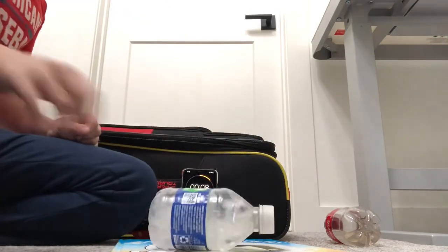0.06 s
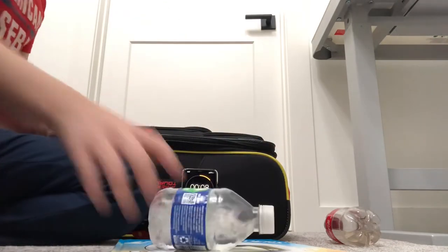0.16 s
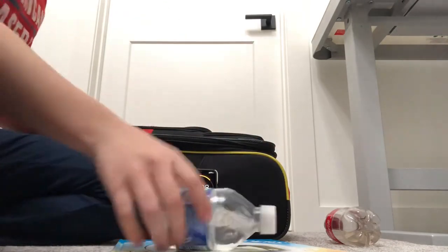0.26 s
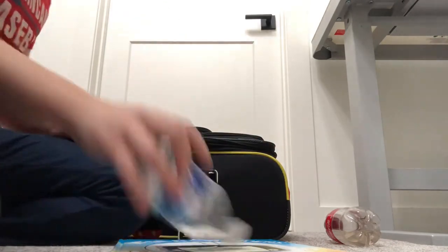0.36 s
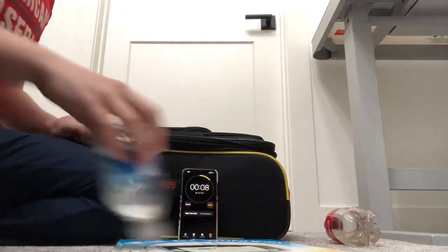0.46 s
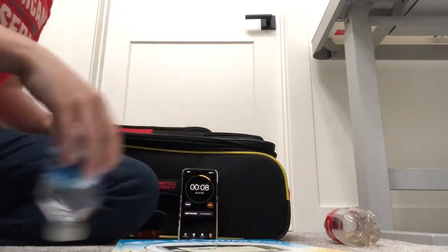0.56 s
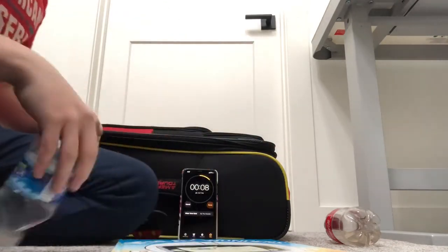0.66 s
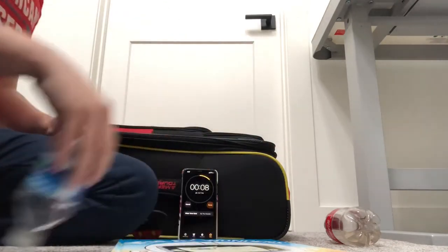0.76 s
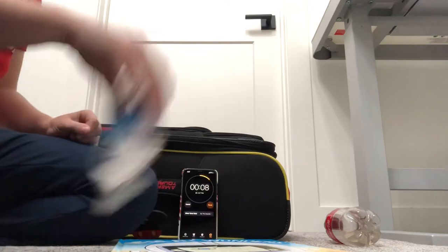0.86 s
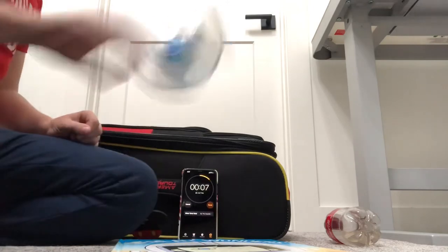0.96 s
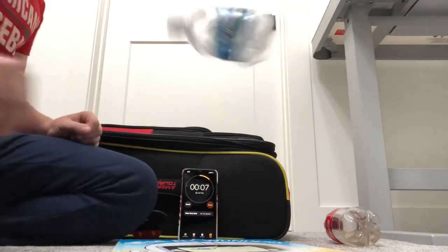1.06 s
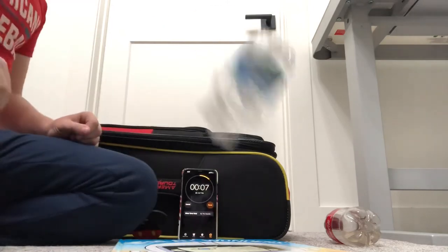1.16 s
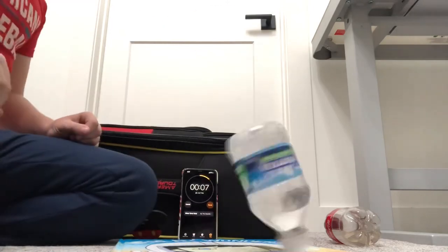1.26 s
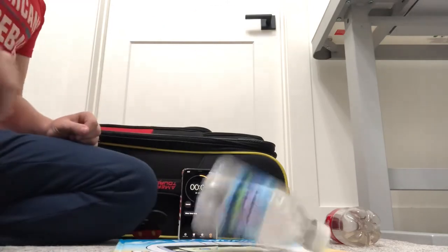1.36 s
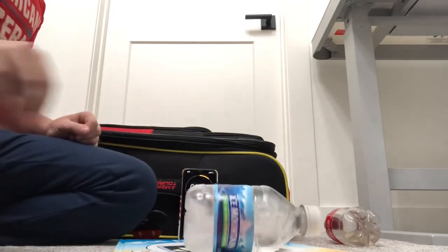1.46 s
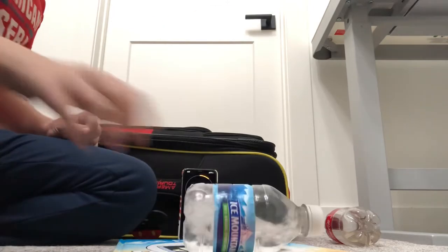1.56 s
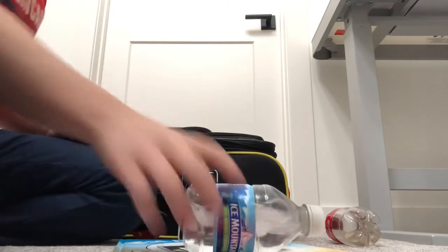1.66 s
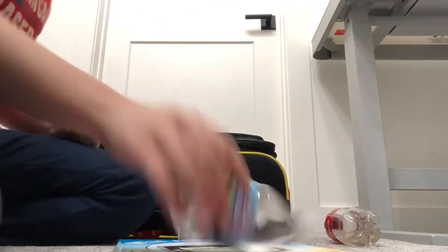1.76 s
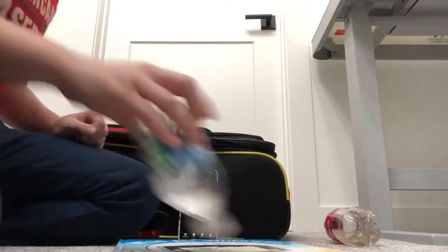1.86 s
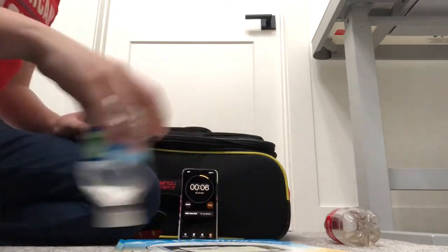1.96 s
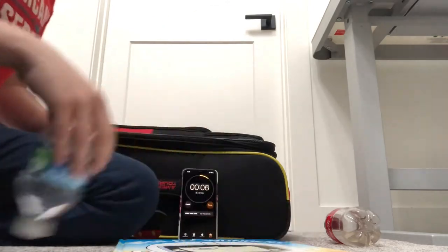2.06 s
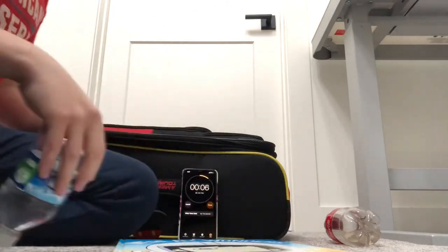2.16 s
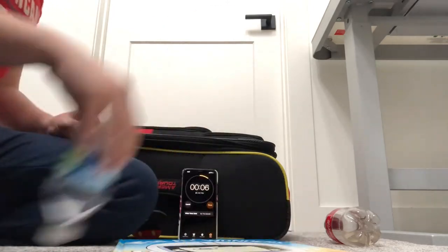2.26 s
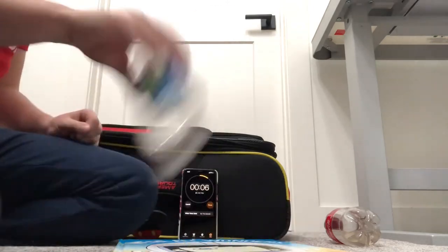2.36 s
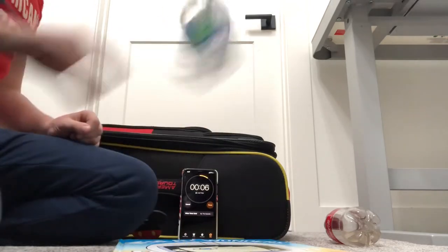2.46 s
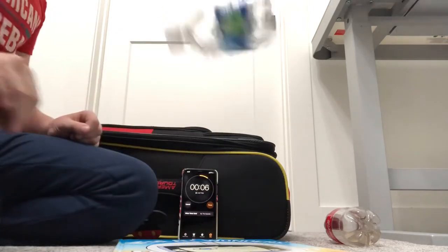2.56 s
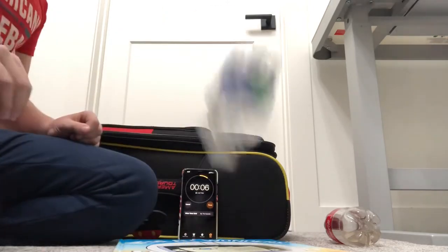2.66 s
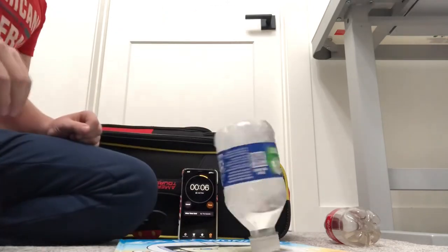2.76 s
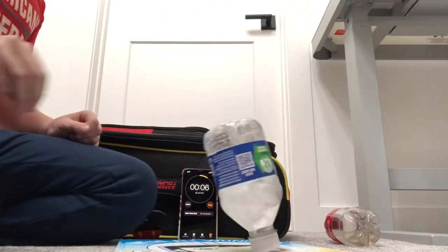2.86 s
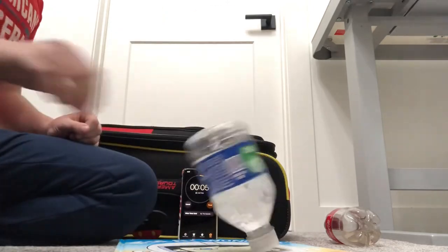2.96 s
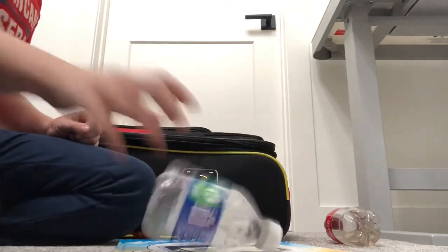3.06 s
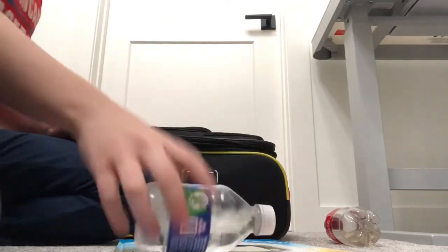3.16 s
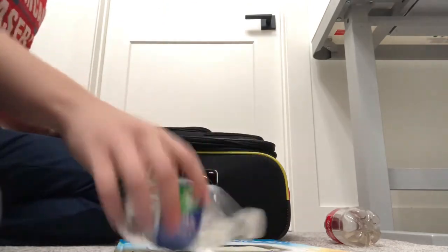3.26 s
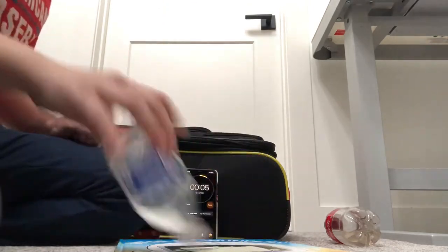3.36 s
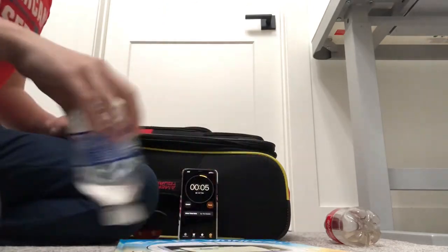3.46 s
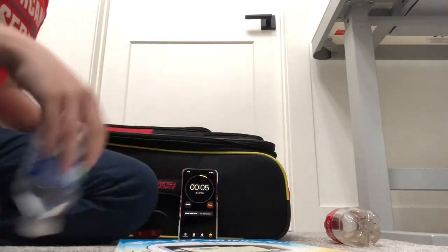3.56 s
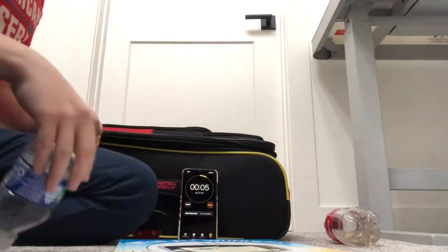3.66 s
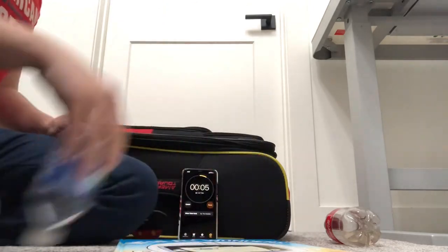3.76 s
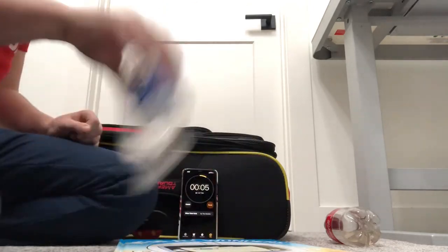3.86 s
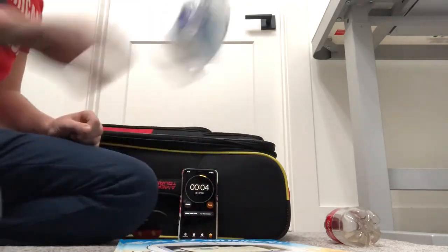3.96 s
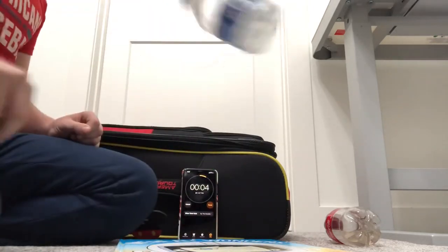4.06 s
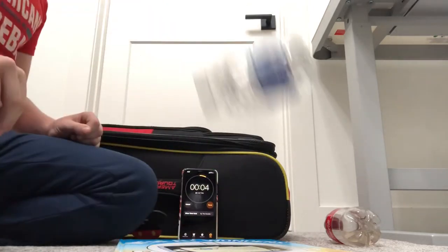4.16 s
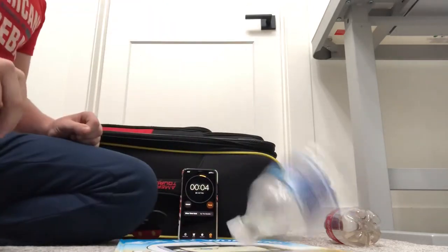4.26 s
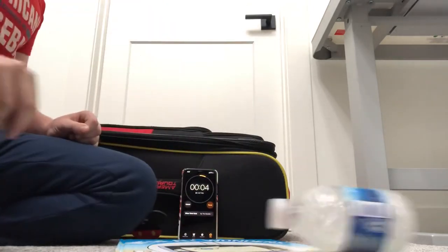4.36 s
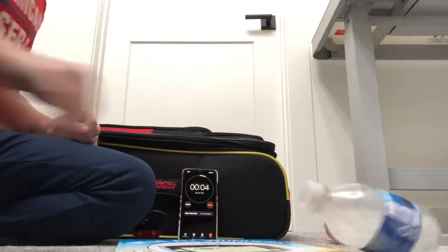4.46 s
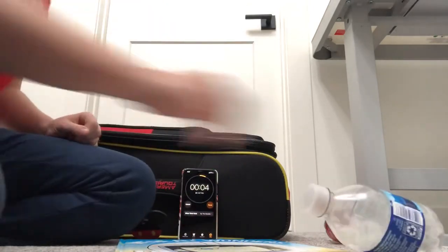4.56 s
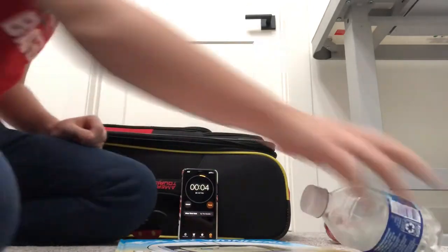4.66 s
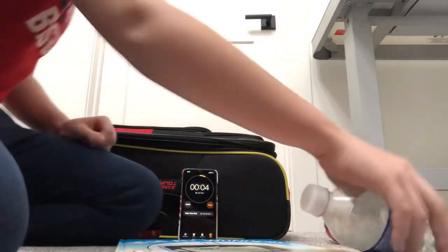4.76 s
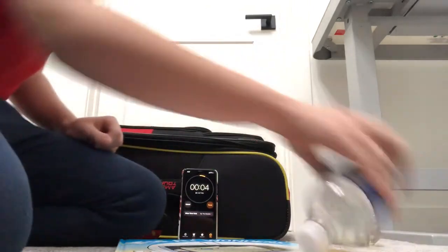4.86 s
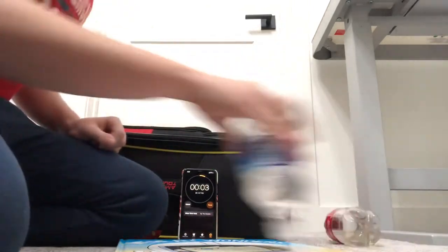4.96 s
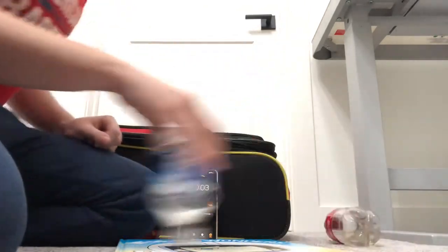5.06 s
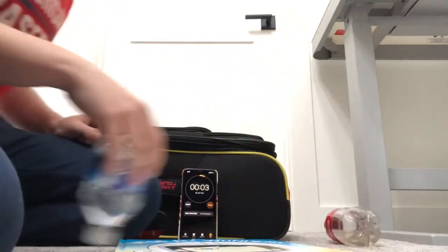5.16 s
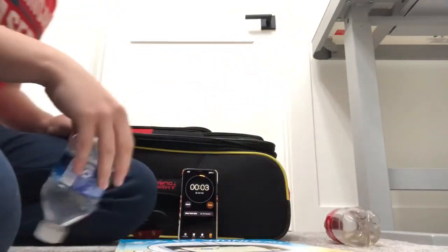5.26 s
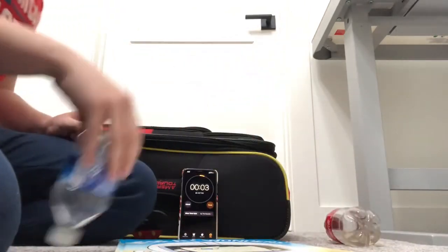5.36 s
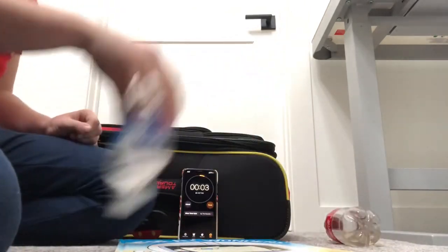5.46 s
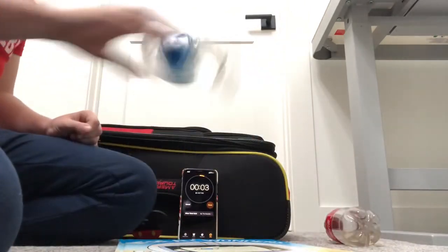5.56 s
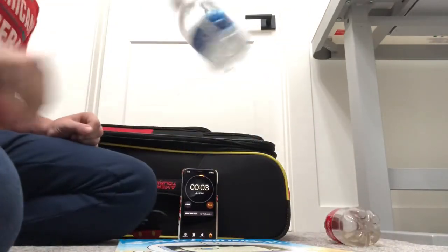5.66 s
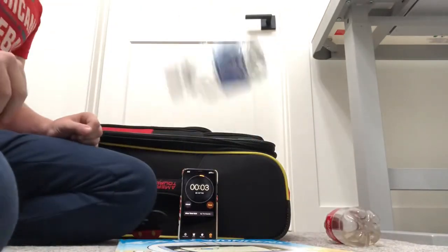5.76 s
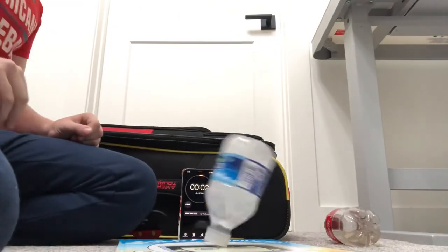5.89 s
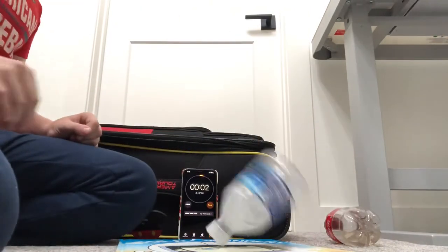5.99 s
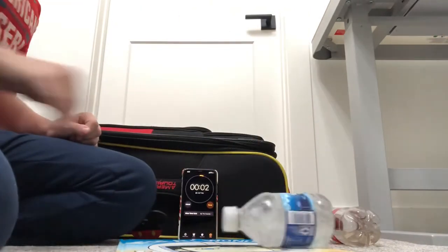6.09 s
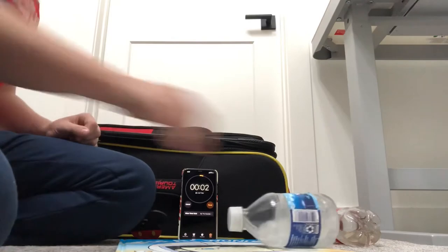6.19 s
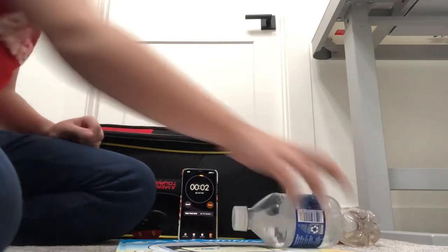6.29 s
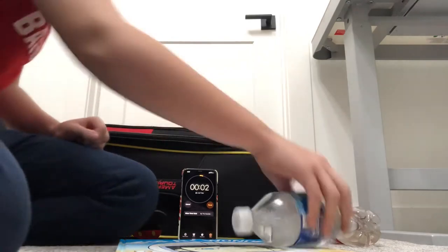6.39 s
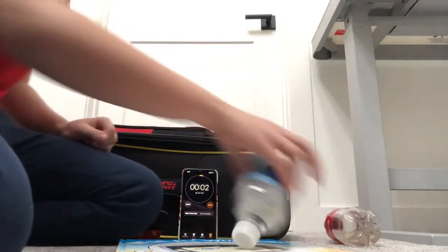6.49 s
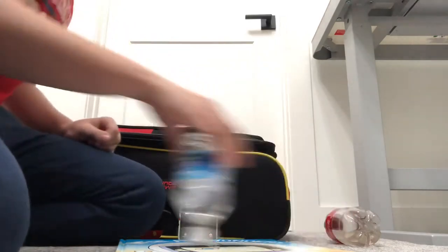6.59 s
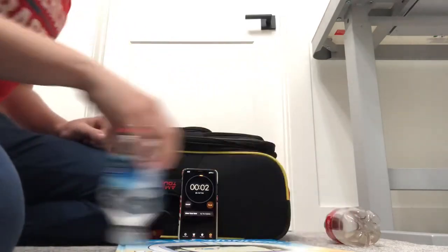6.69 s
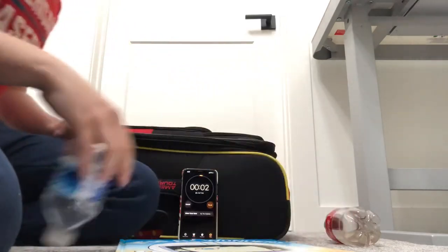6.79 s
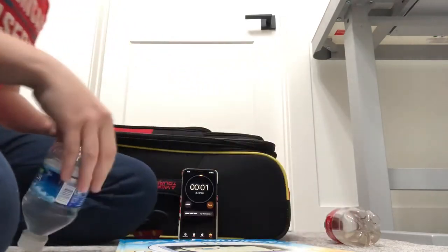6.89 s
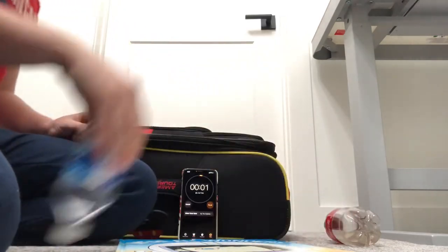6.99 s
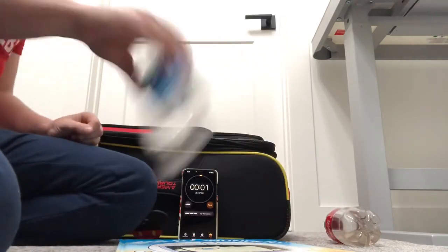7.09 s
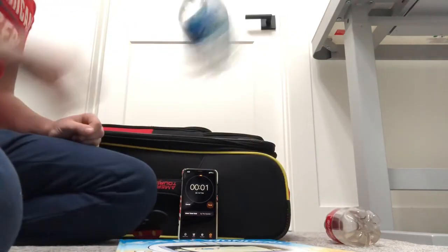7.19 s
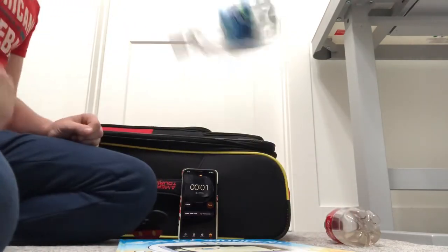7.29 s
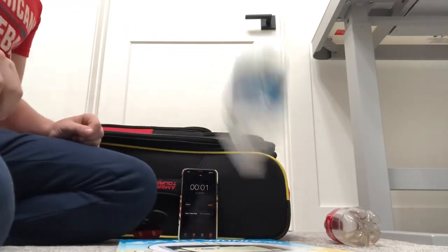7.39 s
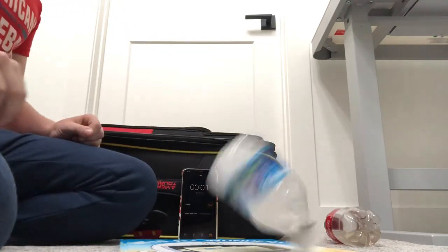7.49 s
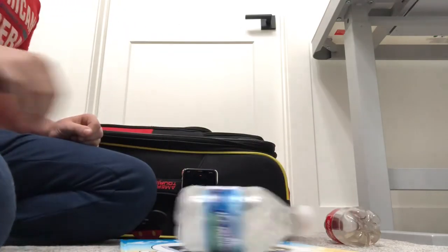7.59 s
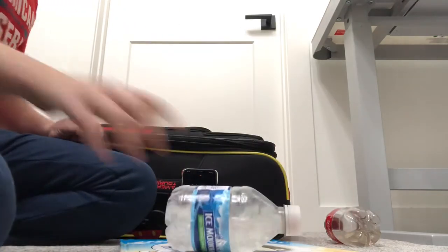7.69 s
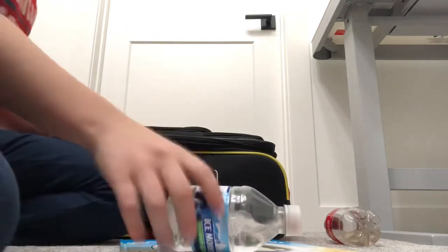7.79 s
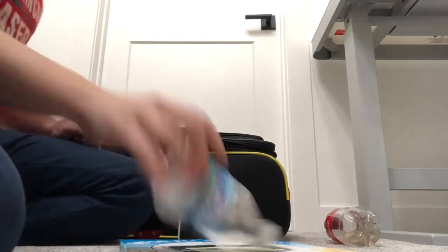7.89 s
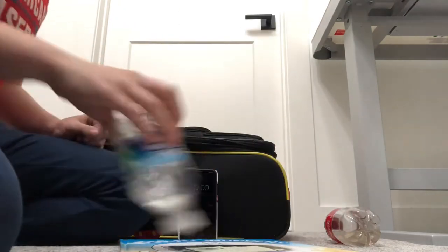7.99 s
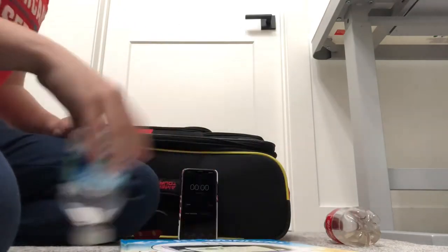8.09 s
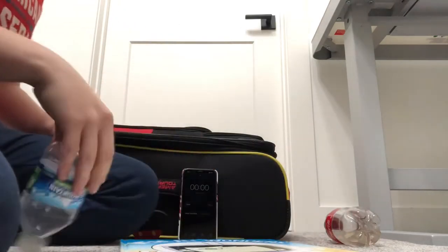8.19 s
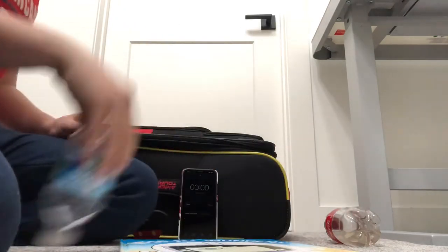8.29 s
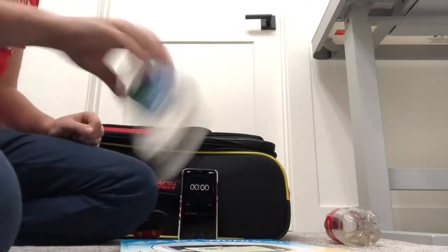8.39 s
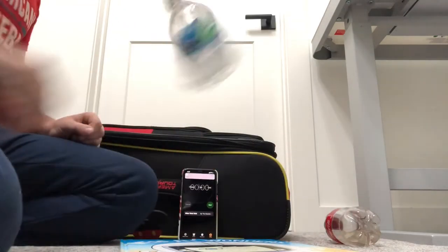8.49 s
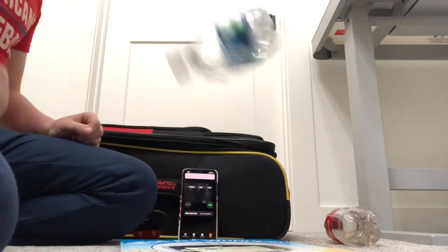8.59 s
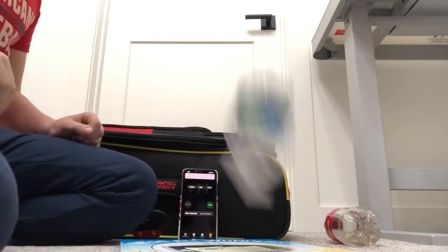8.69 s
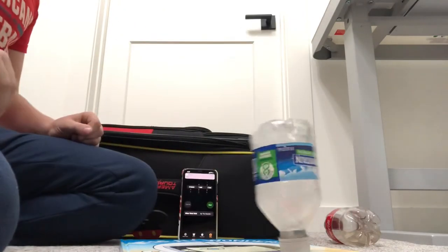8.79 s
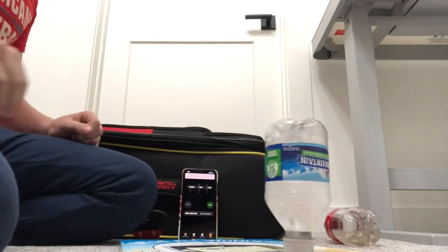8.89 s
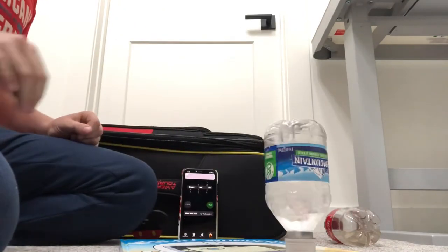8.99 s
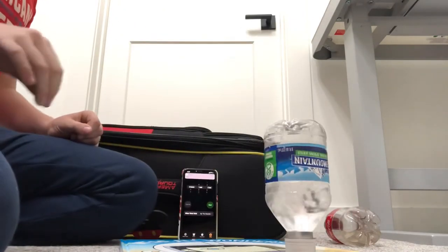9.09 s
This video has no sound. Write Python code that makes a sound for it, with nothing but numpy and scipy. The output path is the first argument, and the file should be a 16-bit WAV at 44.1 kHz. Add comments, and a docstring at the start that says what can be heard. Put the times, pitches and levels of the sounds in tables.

```python
"""A short slosh of water opens over a low room hum; then a half-full plastic bottle is tossed six times.
It lands on a board lying on a carpet, bounces and is picked up again, close to the microphone.
The blows are pushes, decaying sines and dying noise that the board spreads out, treble first.
The water is swept noise, bubble and droplet grains and sliding notes; the wall snaps in damped sines.
Hum, rustle and hiss are coloured noise that swells with movement nearby."""
import sys
import numpy as np
from scipy import signal
from scipy.fft import rfft, irfft, next_fast_len
from scipy.io import wavfile
from scipy.ndimage import uniform_filter1d, minimum_filter1d, map_coordinates

SR = 44100
rng = np.random.default_rng(int(sys.argv[2]) if len(sys.argv) > 2 else 0)


def waveform_to_disk(signal):
    """Save audio, clipped to [-1, 1], as 16-bit WAV at the path in sys.argv[1]."""
    frames = np.transpose(np.atleast_2d(signal))
    scaled = np.clip(frames, -1, 1) * 32767
    samples = np.round(scaled).astype(np.int16)
    wavfile.write(sys.argv[1], SR, samples)


N = 403042

# Tosses of the bottle: pop_s (an air pocket pops), flick_lead_s (wrist flick before the pop),
# surge_lag_s (water hits the far end after the pop), gurgle_db, fizz_db, pop_db, glug_db
TOSS_TABLE = [(0.985, 0.025, 0.023, -35, -41, -32.5, -35.5), (2.454, 0.028, 0.029, -35.5, -43, -32.5, -33),
              (3.962, 0.024, 0.032, -35.5, -40.5, -37.5, -36), (5.608, 0.026, 0.023, -36, -42, -29, -29),
              (7.178, 0.019, 0.021, -32.5, -40, -36, -42), (8.464, .022, 0.021, -36, -42, -35.5, -36)]
# Spectrum of fizzing spray: frequency_hz, density_db (per Hz)
FIZZ_SPECTRUM = [(880, 14), (1500, 3.5), (2630, 0), (7320, 6), (9790, -7.5), (15100, -2), (16000, -22.5),
                 (16500, -25)]


def amp(db):
    """Decibels to an amplitude factor."""
    return 10 ** (np.asarray(db) / 20)


def unit(x):
    """Scale to an rms of 1."""
    return x / np.sqrt(np.mean(x ** 2) + 1e-20)


def along(points, hz):
    """Read (frequency_hz, value) points on a logarithmic frequency axis."""
    point_hz, value = np.transpose(points)
    return np.interp(np.log(hz + 1), np.log(point_hz + 1), value)


def filtered(x, response):
    """Multiply the spectrum of x by a (possibly complex) response of frequency."""
    length = next_fast_len(x.shape[-1] + 8192)
    spectrum = rfft(x, length) * response(np.fft.rfftfreq(length, 1 / SR))
    return irfft(spectrum, length)[..., :x.shape[-1]]


def noise(n, spectrum, patchy_db):
    """Coloured noise of rms 1, its gain wandering in patches of time and frequency."""
    cells = signal.stft(rng.standard_normal(n), nperseg=256)[2]
    field = uniform_filter1d(rng.standard_normal(cells.shape), size=5, axis=0)
    field = uniform_filter1d(field, size=4, axis=1)
    patchy = signal.istft(cells * amp(patchy_db * unit(field)), nperseg=256)[1][:n]
    return unit(filtered(patchy, lambda hz: amp(along(spectrum, hz))))


def grains(times, hz, cycles, size, rise=0):
    """Damped sines, one per entry, that start softly and climb in pitch when rise is above 0."""
    t = np.arange(1300) / SR
    turns = hz[:, None] * t
    envelope = np.exp(-3 * turns / cycles) * (1 - np.exp(-3 * turns))
    wave = size[:, None] * envelope * np.sin(2 * np.pi * turns * (1 + rise * turns / cycles))
    at = np.round(times * SR).astype(int)[:, None] + np.arange(len(t))
    return np.bincount(at.ravel(), wave.ravel(), N + SR)[:N]


def room():
    """A low hum, a rustle of clothes and a thin hiss, swelling together with movement nearby."""
    # Movement near the microphone: time_s, level_db (of the rustle, before its trim)
    stir = [(0.0, -54), (0.91, -65.5), (1.35, -58.5), (2.34, -62.5), (2.95, -53.5), (3.31, -52),
            (3.46, -59), (4.0, -64), (4.17, -63), (4.96, -51), (5.52, -64), (6.11, -56.5), (6.64, -52),
            (6.98, -62.5), (7.79, -54.5), (8.38, -64.5), (8.88, -60), (9.14, -58.5)]
    # Spectrum of the room hum: frequency_hz, density_db (per Hz)
    hum_spectrum = [(13, -73.5), (22, -43.5), (62, -5), (98, -7), (118, 0), (140, -6.5), (165, -1.5),
                    (217, -16), (295, -14.5), (330, -20), (430, -55), (730, -120)]
    # Spectrum of the rustle: frequency_hz, density_db (per Hz)
    rustle_spectrum = [(150, -44), (250, -3.5), (448, -2.5), (502, -3), (540, -6.5), (1080, -9.5),
                       (3000, -29.5), (3900, -52.5), (6600, -120)]
    # Spectrum of the hiss: frequency_hz, density_db (per Hz)
    hiss_spectrum = [(710, -28.5), (1200, -7), (2640, -13), (7170, -12.5), (8640, -19.5), (14800, -16.5),
                     (16000, -18.5), (16500, -28)]
    hum_db, hiss_db, rustle_trim_db = -57.5, -72, -2.5  # hum and hiss where the stir level is -60 dB
    hum_growth, hiss_growth = 1, 0.76  # dB per dB of stir

    stir_db = np.interp(np.arange(N) / SR, *np.transpose(stir))
    swell_db = stir_db + 60
    hum = amp(hum_db + hum_growth * swell_db) * noise(N, hum_spectrum, patchy_db=1.0)
    rustle = amp(rustle_trim_db + stir_db) * noise(N, rustle_spectrum, patchy_db=2.0)
    hiss = amp(hiss_db + hiss_growth * swell_db) * noise(N, hiss_spectrum, patchy_db=4.5)
    return hum + rustle + hiss


def whistle():
    """A faint, thin tone wavers and fades: noise through a very narrow resonance."""
    # The one tone: start_s, length_s, pitch_hz, level_db (before the fade)
    tones = [(3.635, .29, 1175, -62)]
    (start_s, length_s, pitch_hz, level_db), = tones
    progress = np.clip((np.arange(N) / SR - start_s) / length_s, 0, 1)
    tone = filtered(rng.standard_normal(N), lambda hz: 1 / (1 + ((hz - pitch_hz) / 9) ** 2))
    soft_ends = np.minimum(1, 30 * progress * (1 - progress))
    return amp(level_db - 7.4 * progress) * soft_ends * unit(tone)


def surge(start_s, rise, hold_s, fall):
    """Level of one rush of water: climbs, holds and drops along straight lines in dB (dB per s)."""
    t = np.arange(N) / SR
    before = np.maximum(start_s - t, 0)
    after = np.maximum(t - start_s - hold_s, 0)
    return amp(-rise * before - fall * after)


def water_levels():
    """Gurgle and fizz levels: a wrist flick and a main surge per toss, then settling water."""
    # Water settles in the lying bottle: start_s, gurgle_db, fizz_db, fall_db_per_s
    settling = [(0, -30, -55, 195), (4.45, -48.5, -76.5, 19.5)]
    surge_rise, surge_hold_s, gurgle_fall, fizz_fall = 2360, 0.023, 200, 260  # slopes in dB per s
    flick_db = -8.5  # against the main surge
    flick_rise, flick_gurgle_fall, flick_fizz_fall = 950, 290, 330  # dB per s

    gurgle, fizz = np.zeros((2, N))
    for pop_s, lead_s, lag_s, gurgle_db, fizz_db, *_ in TOSS_TABLE:
        flick_s, main_s = pop_s - lead_s, pop_s + lag_s
        gurgle_flick = amp(flick_db) * surge(flick_s, flick_rise, 0, flick_gurgle_fall)
        fizz_flick = amp(flick_db) * surge(flick_s, flick_rise, 0, flick_fizz_fall)
        gurgle += amp(gurgle_db) * (gurgle_flick + surge(main_s, surge_rise, surge_hold_s, gurgle_fall))
        fizz += amp(fizz_db) * (fizz_flick + surge(main_s, surge_rise, surge_hold_s, fizz_fall))
    for start_s, gurgle_db, fizz_db, fall in settling:
        shape = surge(start_s, surge_rise, 0, fall)
        gurgle += amp(gurgle_db) * shape
        fizz += amp(fizz_db) * shape
    return gurgle, fizz


def slops():
    """A swish of water with small rising bubble notes in it, and ticking, fizzing spray on the wall."""
    # Spectrum of the swish: frequency_hz, density_db (per Hz)
    swish_spectrum = [(100, -31), (200, -4.5), (400, 2), (1100, -5.5), (2000, -18.5), (3000, -25.5),
                      (4500, -42)]
    gurgle, fizz = water_levels()
    draw = rng.random((5000, 2))
    spread = rng.standard_normal(len(draw))
    at = (draw[:, 0] * N).astype(int)

    wet = gurgle[at] > 1e-5  # bubbles only where water moves
    bubble_hz = np.clip(620 * np.exp(0.82 * spread), 200, 6000)[wet]
    bubble_size = amp(-3 * np.log(draw[wet, 1])) * gurgle[at[wet]]
    bubbles = amp(-16) * grains(at[wet] / SR, bubble_hz, 5.6, bubble_size, rise=0.078)
    swish = amp(-5.0) * gurgle * noise(N, swish_spectrum, patchy_db=3.0)

    tick_hz = 6000 * np.exp(.35 * spread[-900:])
    tick_size = fizz[at[:900]] * amp(5 * spread[900:1800])
    ticks = amp(14.5) * grains(at[:900] / SR, tick_hz, 4, tick_size)
    # scattered droplets make the spray level uneven
    droplets = grains(draw[:1500, 0] * N / SR, np.full(1500, 1500.), 1.5, amp(7 * spread[:1500]))
    drop_gain = 1 + .5 * np.abs(droplets)
    spray = fizz * unit(drop_gain * noise(N, FIZZ_SPECTRUM, patchy_db=4.5))
    return bubbles + swish + ticks + spray


def glugs():
    """Short notes swell, fade and sag in pitch; each toss adds a pop and an air-space note sliding down."""
    # Notes of wall dents and air pockets: start_s, pitch_hz, level_db
    notes = [(0.105, 2120, -46), (0.332, 1350, -34), (.343, 1260, -25.5), (1.041, 281, -41.5),
             (.706, 610, -50), (1.803, 435, -23), (3.31, 523, -18), (5.445, 2150, -52), (5.726, 727, -39.5),
             (7.2, 610, -33), (8.185, 1080, -47)]
    pop_hz = 1113
    rise_1k_s, rise_power = .0018, 1.5  # swell time up from 1 kHz; lower notes swell slower
    high_hz, low_hz, drop_s, slide_s = 410, 212, .04, .01  # the glug's slide, centred on drop_s
    glug_lag_s, glug_rise_s = .008, 0.053  # start after the pop; time scale of swell and fade

    out, t = np.zeros(N + SR), np.arange(SR // 4) / SR
    pops = [(pop_s, pop_hz, pop_db) for pop_s, *_, pop_db, _ in TOSS_TABLE]
    for start_s, hz, level_db in notes + pops:
        u = t / (rise_1k_s * max(1000 / hz, 1) ** rise_power)
        note = u * np.exp(1 - u) * np.sin(2 * np.pi * hz * t * (1 - 0.01 * u))
        out[round(start_s * SR):][:len(t)] += amp(level_db) * note

    pitch = low_hz + (high_hz - low_hz) / (1 + np.exp((t - drop_s) / slide_s))
    u = t / glug_rise_s
    glug = np.sqrt(u) * np.exp(-u) * np.sin(2 * np.pi * np.cumsum(pitch) / SR)
    for pop_s, *_, glug_db in TOSS_TABLE:
        out[round((pop_s + glug_lag_s) * SR):][:len(t)] += amp(glug_db) * glug
    return out[:N]


def snaps():
    """The thin wall snaps under fingers and water: damped sines, each with a decaying breath of spray."""
    # Snaps: start_s, level_db (relative; click and spray each have their own gain), pitch_hz
    clicks = [(.413, -60, 6150), (1.0181, -40.5, 4000), (2.479, -43, 7200), (2.5055, -50, 5000),
              (2.5232, -43, 4300), (2.6275, -60, 10800), (3.289, -64, 4500), (3.4535, -56.5, 7180),
              (3.992, -51, 7200), (4.893, -56, 5720), (5.269, -52.5, 10630), (5.6134, -40.5, 6270),
              (5.6316, -46, 5770), (6.124, -52, 3030), (7.1868, -38.5, 7000), (7.658, -53, 5500),
              (8.007, -57, 14900), (8.0346, -54, 5970), (8.487, -40.5, 5650), (9.0767, -62, 9080),
              (9.1036, -52.5, 8600)]
    start_s, level_db, pitch_hz = np.transpose(clicks)
    ticks = np.zeros(N)
    ticks[np.round(start_s * SR).astype(int)] = amp(level_db)
    decay = amp(-60 * np.arange(2000) / SR / 0.038)  # 60 dB in 38 ms
    puff = signal.fftconvolve(ticks, decay)[:N]
    spray = amp(4) * puff * noise(N, FIZZ_SPECTRUM, patchy_db=2.0)
    return amp(18.5) * grains(start_s, pitch_hz, 5.9, amp(level_db)) + spray


def dying(n, share):
    """Noise of rumble and splash whose bands die at their own speeds, times share."""
    # Full decay times: frequency_hz, t60_s
    tail = [(60, 0.47), (160, 0.067), (420, 0.48), (1100, 0.52), (2900, 0.46), (8000, 0.47), (16000, 0.27)]
    hz, t, cells = signal.stft(rng.standard_normal(n), SR, nperseg=128)
    t60_s = share * along(tail, hz)
    return signal.istft(cells * amp(-60 * t / t60_s[:, None]), SR, nperseg=128)[1][:n]


def bending(hz, lag, power):
    """Bending waves in the board: lower pitch arrives later, by lag * kHz ** -power s, 16 kHz on time."""
    khz = np.maximum(hz, 40) / 1000
    power = np.clip(power, .1, .95)
    turns = lag * 1000 * (khz ** (1 - power) - 16 ** (1 - power)) / (1 - power)
    advance = hz * lag / 16 ** power  # takes out the delay at 16 kHz
    return np.exp(2j * np.pi * (advance - turns))


def wall_crackle(t, share, crack_db):
    """The wall crackles: a noise burst at the contact, then seven scattered ones, above 1500 Hz."""
    bright = signal.butter(2, 1500, "high", fs=SR, output="sos")
    when = np.append(0, rng.random(7) ** 1.3 * share * 0.12)
    size_db = np.append(crack_db + 7, rng.normal(-16.5, 4.8, 7)) - 60 * when / (share * 0.81)
    gap = t[:, None] - when
    bursts = (amp(size_db) * (gap >= 0) * np.exp(-np.abs(gap) / 0.00044)).sum(axis=1)
    return signal.sosfilt(bright, bursts * rng.standard_normal(len(t)))


def board_ring(t, share):
    """Modes of board and bottle: decaying sines, level and pitch a little different at each blow."""
    # Modes: pitch_hz, level_db (both means), t60_s (full, before share)
    modes = [(108.6, -6, 0.25), (337.6, -0.5, 0.34), (457, -16, 0.47), (723, -6, 0.028), (983, -11.5, 0.21),
             (176.5, 11.5, 0.13), (289.6, -8.5, 0.26), (519, -7.5, 0.39)]
    ring = 0
    for hz, level_db, t60_s in modes:
        decay = amp(level_db + rng.normal(0, 3) - 60 * t / (share * t60_s))
        ring = ring + decay * np.sin(2 * np.pi * hz * rng.normal(1, .025) * t)
    return ring


def knocks():
    """Each contact is a sharp push, ringing modes, crackle and a ragged rumble, smeared by the board."""
    # Contacts of bottle with board and fingers: start_s, slap_db, then against the slap thud_db (floor),
    # body_db (bottle), splash_db, crack_db (first crack); share (of the full ring time, no unit)
    contacts = [(0.247, -22.5, -10.5, -10, 1, -15, 1), (.35, -11.5, -8.5, 3, -8, 2.5, 0.6),
                (0.703, -37.5, -13, -9, 11, 5, 0.76), (1.239, -21.5, -15, -11, -7, -15, .9),
                (1.26, 9, -12.5, -7.5, -4, 1, 0.76), (1.382, -1, -20, -13, 0, -1, 0.87),
                (1.389, 5, -27, -17, -6.5, -6, 0.28), (1.42, -18.5, -8, -6, -14, 7.5, .65),
                (1.715, -16, -18.5, -14, -3, -5, .7), (1.776, -22, -7, -8, 3, 6, 1),
                (1.799, -16, -12, 2, -18, 7, 0.86), (2.728, -22, -2, -2.5, -9, -14, 1),
                (2.744, 8.5, -14.5, -3, -2.5, 2, 0.69), (3.074, 3, -21.5, -15.5, -4.5, -20, 0.74),
                (3.082, 3.5, -58, -18, -14, 1, 0.41), (3.102, -7.5, -36, -16.5, 5.5, 10.5, 0.73),
                (3.139, -4, -27, -24, 0, 8, 0.77), (3.143, -19.5, -18, -3, 20.5, 9, 0.62),
                (3.309, -9.5, -11, -2, -8, 2.5, 0.71), (3.347, -19.5, -32, -20, 2, 1, .49),
                (4.245, -28.5, -7, -11, -8, -6, 0.88), (4.2668, 10.5, -15.5, -11.5, -8.5, 18, 0.76),
                (4.297, 2.5, -38, -16, -13.5, -3.5, 0.38), (4.303, 8, -27, -29.5, -10, -6.5, 0.49),
                (4.311, -1.5, -25, -11, 6.5, 3.5, 0.77), (4.752, -21.5, -17, -18, -2.5, -4.5, 1),
                (4.829, -19, -14, -7, -3, -5, 0.37), (4.866, -6, -20.5, -10, -9.5, 13, 0.64),
                (5.008, -37, -18, -9, 14, 4, 0.29), (5.098, -19, -1, 3.5, -1, 8.5, 0.61),
                (5.16, -26.5, 2, -15, -2, -0.5, 0.63), (5.214, -33, -16, -31, 1, 6, 0.86),
                (5.253, -24.5, -24, -46, 3, -13, 1), (5.869, -37.5, -2.5, 6.5, 11, -5, 1),
                (5.897, 7.5, -10.5, -5, -2.5, 9.5, 0.82), (6.05, -22, -19, 10.5, 0, -6, 0.95),
                (6.057, 5.5, -30, -24, -7, -0.5, 0.47), (6.082, -16.5, -3, -6, 7.5, 5, 0.97),
                (6.327, -42, 4, -15, 19.5, 6, 0.51), (6.355, -20, -13, -12.5, 1, -7, 1),
                (6.458, -15, -5.5, 1.5, -6, 6, 0.67), (6.649, -43, -18, -14, 13, 7, .87),
                (6.679, -15, -9, -8, -6.5, 0.5, 0.84), (7.46, -30, -7, 1, -5, -8, .9),
                (7.479, 9.5, -10, -10, -3, 0.5, .64), (7.569, -1.5, -23, -7.5, -5.5, -1.5, 0.74),
                (7.586, -1.5, -14.5, -25, 1.5, 2.5, 0.69), (7.815, -28.5, -12, -2.5, 6.5, 1, 0.59),
                (7.897, -9, -13, -3.5, -6.5, 7, 0.71), (8.119, -23.5, -27.5, -31.5, 3, -5, 1),
                (8.182, -29, -32, -21, 2, -5, .9), (8.251, -31.5, -14, -23, 1.5, 0.5, 0.97),
                (8.736, -23, -7.5, -8, 0, -6, 1), (8.758, 9, -12, -8, -1.5, 1.5, 0.82),
                (8.781, -3, -12, -4, -17, 3, 0.22), (8.923, -22.5, -48, 1, -14, 2.5, 0.92),
                (9.025, -34, -3.5, -17, -22, 2, .7), (9.053, -40.5, -6, -8, -19, 9.5, 0.73)]
    # Spectrum of the first push: frequency_hz, density_db (per Hz)
    push_spectrum = [(40, -27), (110, -2), (300, 12), (800, 2), (2100, -9.5), (3000, -23), (6000, -37.5),
                     (16000, -43)]
    # Spectrum of the rumble, before its bass cut: frequency_hz, density_db (per Hz)
    rumble_spectrum = [(18, -35.5), (30, -11.5), (70, -1), (112, 7.5), (268, -6.5), (340, -10.5),
                       (399, -12.5), (732, -20), (792, -22.5), (1940, -43.5), (7670, -54.5), (15200, -71.5),
                       (16500, -59.5)]

    lead = 800  # samples of room ahead of the push
    out, t = np.zeros(N + SR), np.arange(SR // 3) / SR
    push = filtered(np.arange(lead + len(t)) == lead, lambda hz: amp(along(push_spectrum, hz)))
    push = push / abs(push).max()
    onset = 1 - np.exp(-t / 0.0005)
    fade_out = np.minimum(1, (t[-1] - t) * 20)
    for start_s, slap_db, thud_db, body_db, splash_db, crack_db, share in contacts:
        share = np.clip(share, .1, 3)
        ring = board_ring(t, share)
        crackle = wall_crackle(t, share, crack_db)
        # water and crumpling plastic arrive in lumps a few ms long
        lumps = amp(3.1 * map_coordinates(rng.standard_normal(90), [t * 240], order=1))
        ragged = lumps * (0.53 + np.exp(-t / .02)) * dying(len(t), share)
        rumble = filtered(ragged, lambda hz: amp(along(rumble_spectrum, hz)) * hz / (hz + 120))
        rumble = rumble / rumble[:900].std()
        after = (amp(-15.5) * ring + amp(-8.0) * rumble + amp(-21) * crackle) * onset
        hit = amp(crack_db) * push + np.pad(after * fade_out, (lead, 0))
        colour = [(130, thud_db), (420, body_db), (1500, 0.00094), (2800, 0.01), (3600, splash_db)]
        hit = filtered(hit, lambda hz: amp(along(colour, hz)) * bending(hz, lag=.0016, power=.8))
        out[round(start_s * SR):][:len(hit)] += amp(slap_db) * hit
    return out[lead:N + lead]


def scene():
    """Room, water and bottle summed on one channel."""
    return (room() + whistle() + slops() + glugs() + snaps() + knocks())[None]


def record(dry):
    """The microphone drops the deep bass, a limiter holds the peaks, a steep low-pass cuts the top."""
    top_hz = 16300
    x = signal.sosfilt(signal.butter(2, 60, "high", fs=SR, output="sos"), dry)
    need = np.minimum(1, .93 / (np.abs(x) + 1e-9))
    gain = uniform_filter1d(minimum_filter1d(need, size=161), size=81)  # smooth, ahead of each peak
    return filtered(gain * x, lambda hz: 1 / (1 + (hz / top_hz) ** 80))


dry = scene()
out = record(dry)
waveform_to_disk(out)
```